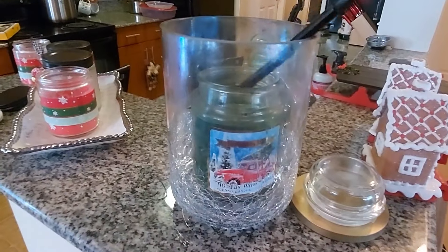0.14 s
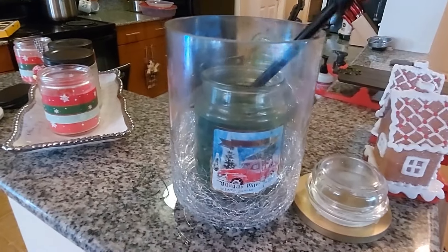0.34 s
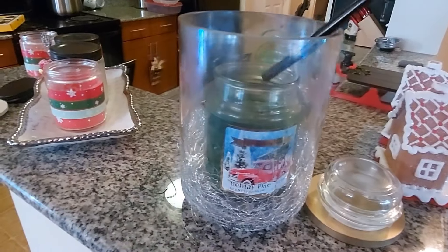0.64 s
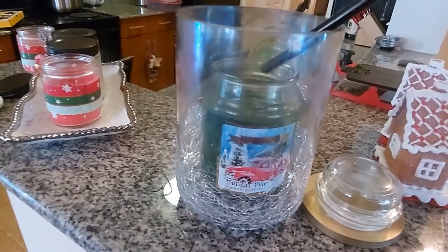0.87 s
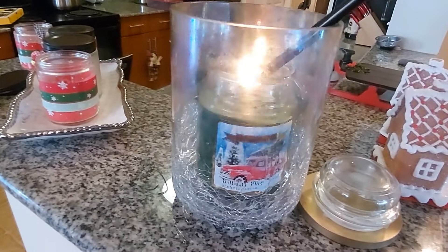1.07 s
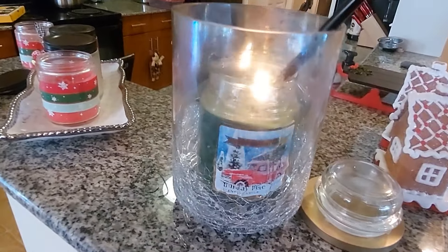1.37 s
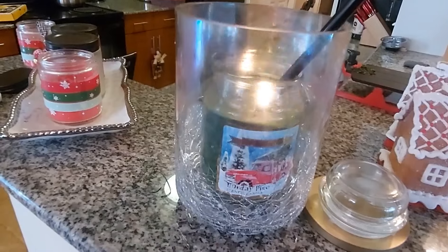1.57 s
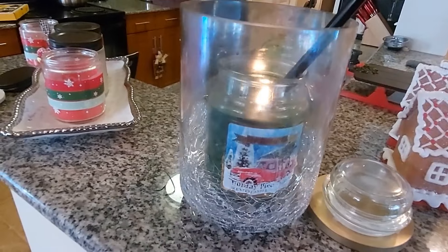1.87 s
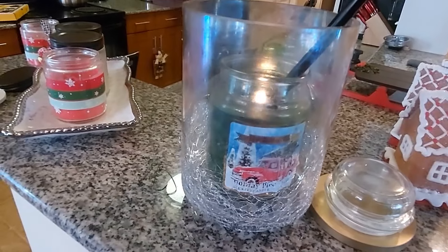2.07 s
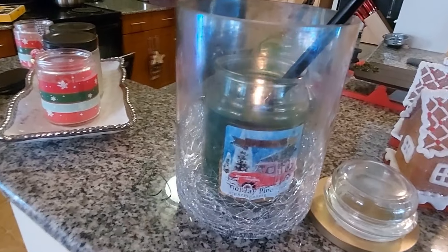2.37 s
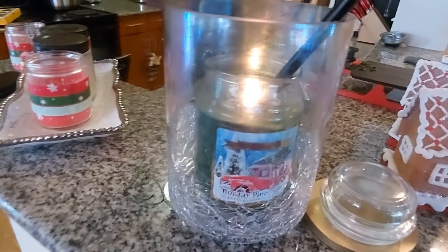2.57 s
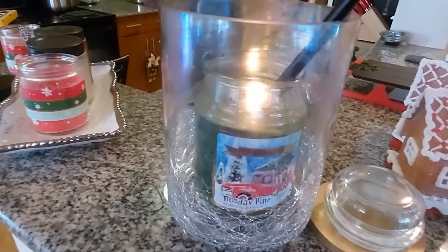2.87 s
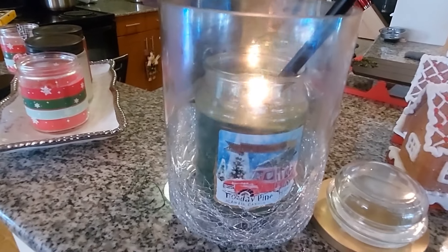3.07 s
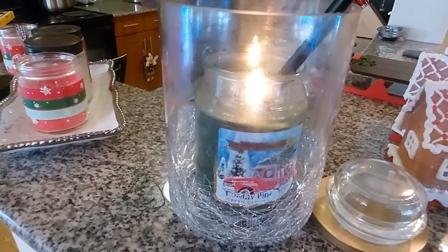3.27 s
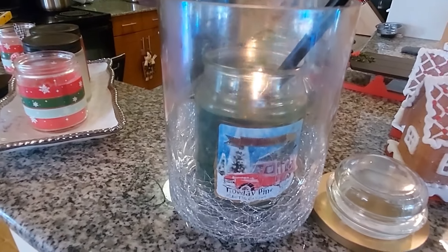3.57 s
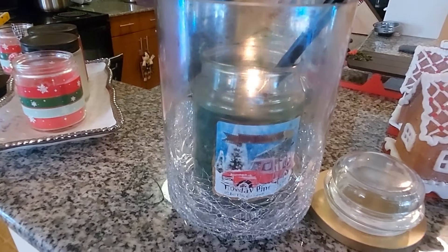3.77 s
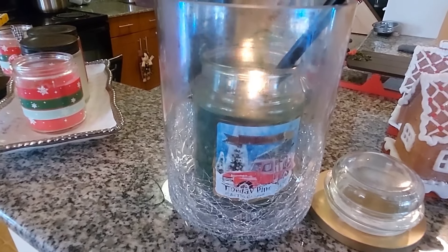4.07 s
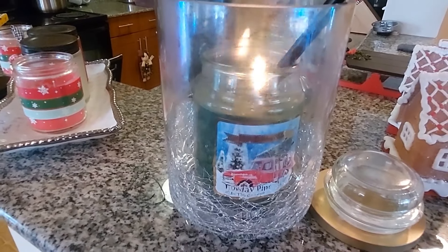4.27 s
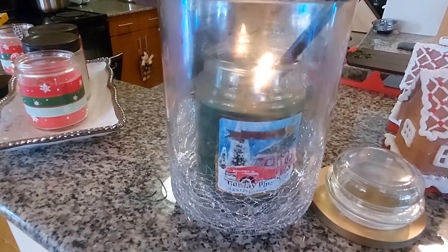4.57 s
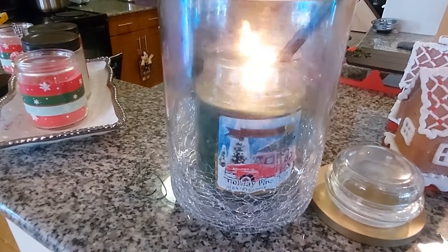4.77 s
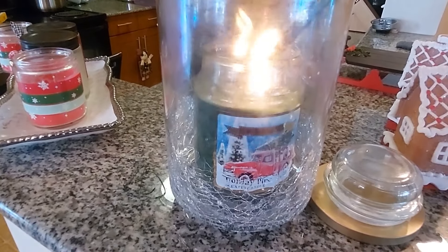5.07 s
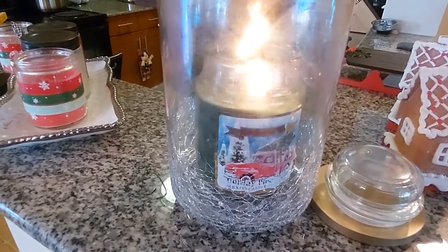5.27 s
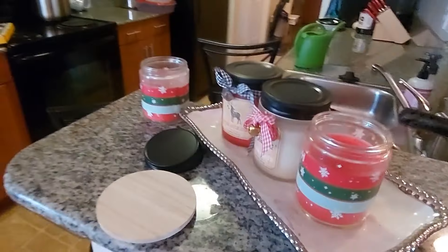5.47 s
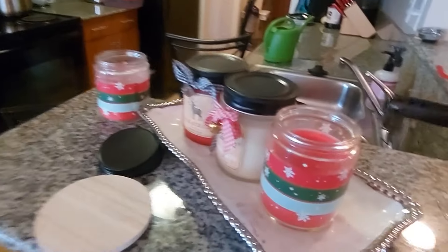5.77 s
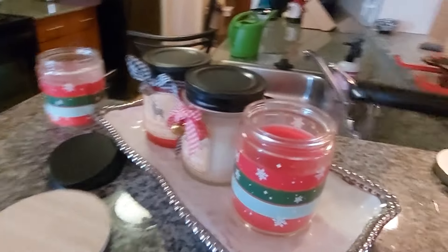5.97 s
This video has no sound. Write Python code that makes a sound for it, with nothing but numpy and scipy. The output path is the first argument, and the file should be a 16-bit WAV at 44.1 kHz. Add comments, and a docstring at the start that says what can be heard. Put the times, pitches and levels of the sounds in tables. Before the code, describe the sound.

A close stereo microphone in a small, quiet kitchen with low wavering hum and a soft, fluttering low rush. A gritty squeeze leads to a loud, sharp plastic lighter snap at 0.1 seconds, with a faint glass clink at 0.17. Around 0.5 to 0.6 the trigger scrapes and creaks back, then the nozzle clinks brightly on glass at 0.64 and 0.75, with a weaker clink at 0.83. A second hard snap at 0.98 is followed by a soft, low whump of catching gas at about 1.03, and another clink at 1.23. Delicate rim tinks come at 1.4, 2.0 and 2.7, between quiet stretches. Small plastic ticks and creaks scatter from 4.3 to 5.1. A brief cloth swish rises at 5.6, then the lighter lands on stone at 5.9 with a thud, hard taps, dull rubbing and a trigger rattle until about 6.1.

```python
"""A long utility lighter lights a jar candle that stands in a glass vase on a stone kitchen counter.
Its trigger snaps and creaks as short chatters of tiny impacts, coloured by the plastic case.
The nozzle clinks on the glass and the gas catches with a soft whump: both are sets of dying sine waves.
Then a sleeve swishes (moving band of noise) and the lighter lands with thuds, taps and rubbing.
An appliance hums (wavering sines) and a low rush swells (noise); the small kitchen reflects the blows."""
import sys
import numpy as np
from scipy import signal
from scipy.fft import rfft, irfft, next_fast_len
from scipy.io import wavfile
from scipy.ndimage import uniform_filter1d

SR = 44100
rng = np.random.default_rng(int(sys.argv[2]) if len(sys.argv) > 2 else 0)


def wrap_up_sound(samples):
    """Save the sound to the file named by the first command line argument, as 16-bit audio."""
    columns = np.atleast_2d(samples).T
    # keep every value between -1 and 1, then stretch to whole-number steps
    tamed = np.clip(columns, -1, 1)
    steps = np.round(tamed * 32767).astype(np.int16)
    wavfile.write(sys.argv[1], SR, steps)


N = 270333
TIME = np.arange(N) / SR
RING = TIME[:int(SR * .7)]  # time axis of one ring [s]

# colour of the lighter's plastic case: (frequency [Hz], level [dB])
CASE_COLOUR = [(60, -24), (220, -17), (600, -29.5), (1000, -14), (1300, -3), (1550, 5), (1950, -4.5),
               (2800, -8), (3800, -0.5), (4900, -2.5), (5900, -0.5), (8000, -9), (10500, 0), (13500, 4.5),
               (16000, -3)]
CASE_DB = -9  # level added to each snap and scrape of the case
CLICK_PAN_DB = 1.5  # left minus right
# the lighter and the hand land on the counter: (time [s], level [dB])
LANDINGS = [(5.8959, -0.5), (5.928, -14.5), (5.949, -9.5), (6.009, -23.5), (6.039, -19.5)]


def amp(db):
    """Turns decibels into a gain."""
    return 10 ** (np.asarray(db) / 20)


def unit(x):
    """Scales to an rms (average strength) of 1."""
    return x / np.sqrt(np.mean(x ** 2) + 1e-20)


def read(points, hz):
    """Reads a curve between its points, along a logarithmic frequency axis."""
    f, value = np.transpose(points)
    return np.interp(np.log(hz + 1), np.log(f + 1), value)


def sides(pan_db):
    """Left and right gains that differ by pan_db; positive is louder on the left."""
    return amp([[pan_db / 2], [-pan_db / 2]])


def add(mix, s, sound):
    """Adds a stereo sound to the mix at time s."""
    part = mix[:, max(round(s * SR), 0):][:, :sound.shape[1]]
    part += sound[:, :part.shape[1]]


def fade(t, t60):
    """Exponential decay that falls by 60 dB in t60 seconds."""
    return np.exp(-np.log(1000) * t / t60)


def drift(rate_hz):
    """Slow random wander of rms 1: noise with only its slowest parts kept."""
    hz = np.fft.rfftfreq(N, 1 / SR)
    slow = rfft(rng.standard_normal(N)) * np.exp(-(hz / rate_hz) ** 2)
    return unit(irfft(slow, N))


def pair(x):
    """Makes two unrelated channels alike in the bass, as two points close together hear them."""
    # how alike left and right are: (frequency [Hz], likeness [0 to 1])
    likeness = [(30, 0.99), (120, 0.53), (300, 0.8), (700, 0.43), (1500, 0.092), (15000, 0.033)]
    size = x.shape[1]
    a, b = rfft(x)
    same = np.clip(read(likeness, np.fft.rfftfreq(size, 1 / SR)), -1, 1)
    right = same * a + np.sqrt(1 - same ** 2) * b
    return irfft(np.array([a, right]), size)


def noise(colour):
    """Steady stereo noise of rms 1, shaped by a colour curve."""
    white = pair(rng.standard_normal((2, N)))
    gain = amp(read(colour, np.fft.rfftfreq(N, 1 / SR)))
    return unit(irfft(rfft(white) * gain, N))


def contact(colour, tilt_db, t60, rise=0.00037, pivot_hz=2500, size=4096):
    """A fast-dying chatter of tiny impacts, heard through a body of the given colour; energy about 1."""
    hz, t = abs(np.fft.fftfreq(size, 1 / SR)), TIME[:size]
    impacts = pair(rng.choice([-1., 1.], (2, size)))
    chatter = impacts * (1 - np.exp(-t / rise)) * fade(t, t60)
    # even out the chatter's own spectrum, so that the colour alone decides the balance
    power = uniform_filter1d(abs(np.fft.fft(chatter)) ** 2, size=24, axis=1, mode="wrap")
    octaves = np.log2(np.maximum(hz / pivot_hz, .5))  # no tilt further than one octave down
    gain = unit(amp(read(colour, hz) + tilt_db * octaves)) / np.sqrt(power)
    # minimum phase: the body rings only after the blow
    body = np.fft.ifft(np.exp(np.conj(signal.hilbert(np.log(gain))))).real
    return signal.fftconvolve(chatter, body[:, :size // 2], axes=1)


def ring(modes, tilt_db=0, rise=0.00063, scatter_db=1, pivot_hz=2500):
    """A struck body rings as dying sine waves; each blow weighs them a little differently."""
    # how far left leads right within a wave: (frequency [Hz], lead [radians])
    left_lead = [(450, 0), (1173, 0.8), (1680, 2.1), (2100, -0.3), (2938, -1.3), (3420, -0.15),
                 (3900, -2.5), (4400, -1.5), (5400, -0.8)]
    out = np.zeros((2, len(RING)))
    for hz, db, t60, pan_db in modes:
        level_db = db + scatter_db * rng.standard_normal() + tilt_db * np.log2(hz / pivot_hz)
        phase = read(left_lead, hz) * np.array([[.5], [-.5]])
        wave = np.sin(2 * np.pi * hz * RING + phase)
        out += amp(level_db) * sides(pan_db) * wave * fade(RING, t60)
    return out * (1 - np.exp(-RING / rise))


def stroke(peak_s, rise_db_per_s, fall_db_per_s):
    """Gain of a rubbing stroke that builds up to 1 at its peak and dies away."""
    before = (peak_s - TIME) * rise_db_per_s
    after = (TIME - peak_s) * fall_db_per_s
    return amp(-np.maximum(before, after))


def room_tone(level_db=-66.5):
    """Steady noise of the quiet room, strongest in the bass."""
    # colour of the room tone: (frequency [Hz], relative level [dB])
    tone_colour = [(15, -48), (25, -22.5), (55, -2), (84, -21), (99, -7.5), (120, 6.5), (148, -14),
                   (228, -3.5), (486, -19.5), (791, -29.5), (1180, -32), (1780, -35), (2520, -36.5),
                   (4330, -41), (15800, -43)]
    return amp(level_db) * noise(tone_colour)


def appliance_hum(waver_db=0.5, waver_turns=0.097):
    """Low sine tones whose level and phase each wander at random."""
    # tones of the appliance: (frequency [Hz], rms level [dB])
    tones = [(59.2, -79.5), (118.4, -77.5), (231.5, -75.5)]
    out = np.zeros(N)
    for hz, db in tones:
        level = amp(db + waver_db * drift(11))
        turns = hz * TIME + waver_turns * drift(1.6)
        out += level * np.sqrt(2) * np.sin(2 * np.pi * turns)
    return out


def rush(steady_db=-77, flutter_db=2.5):
    """Burning gas and moving air: low noise that flutters at random and swells now and then."""
    # colour of the rush: (frequency [Hz], level [dB])
    rush_colour = [(100, -21.5), (250, -3.5), (350, 0.5), (480, 0.5), (600, -16), (900, -24), (2500, -34.5),
                   (6000, -45)]
    # the rush swells and sinks again: (peak time [s], half length [s], level [dB])
    swell_list = [(0.85, 0.89, -67), (2.578, 0.23, -65.5), (3.52, 0.16, -71), (4.551, 0.093, -62.5),
                  (4.855, 0.31, -72), (5.598, 0.11, -64), (6.05, 0.15, -68)]
    power = amp(steady_db) ** 2
    for s, half_s, db in swell_list:
        power = power + (amp(db) * np.exp(-((TIME - s) / half_s) ** 2)) ** 2
    return noise(rush_colour) * np.sqrt(power) * amp(flutter_db * drift(6.7))


def background():
    """Room tone, hum and rush together, a little stronger on the right."""
    return (appliance_hum() + room_tone() + rush()) * sides(pan_db=-2.0)


def kitchen(x, first_s=0.0015):
    """Dense reflections from counter and cupboards, each band dying at its own speed."""
    # decay of the reflections: (frequency [Hz], time to fall by 60 dB [s])
    decay = [(100, 0.72), (500, 0.27), (1500, 0.41), (4000, 0.34), (10000, 0.35), (16000, 0.23)]
    # colour of the reflections: (frequency [Hz], level [dB])
    reflection_colour = [(100, -7.5), (400, 9.5), (1500, -7.5), (3000, -2.5), (6000, -3.5), (12000, -4),
                         (16000, -4.5)]
    shape = (2, len(RING))
    sparse = rng.standard_normal(shape) * (rng.random(shape) < .15)
    echoes = pair(sparse) * (RING > first_s)
    hz, t, z = signal.stft(echoes, SR, nperseg=256)
    tail = signal.istft(z * fade(t, read(decay, hz)[:, None]), SR, nperseg=256)[1]
    size = next_fast_len(N + SR)
    gain = amp(read(reflection_colour, np.fft.rfftfreq(size, 1 / SR)))
    response = rfft(tail / np.linalg.norm(tail[0]), size) * gain
    return irfft(rfft(x, size) * response, size)[:, :N]


def sleeve(width_octaves=0.93):
    """Cloth friction: a band of noise that climbs in pitch, quick to swell and slower to fade."""
    # colour of the cloth: (frequency [Hz], level [dB])
    cloth_colour = [(500, -2), (1000, -6), (1850, 1), (2200, 7.5), (2600, -1), (3800, -0.5), (5500, 0.5),
                    (8000, -5.5), (14000, 5)]
    peak_s, length_s, level_db = 5.585, 0.27, -68.5  # loudest moment, time until it stops, level
    peak_hz, octaves_per_s = 2130, 6.2  # band centre at the loudest moment, and its climb
    hz, t, z = signal.stft(noise(cloth_colour), SR, nperseg=512)
    centre = peak_hz * 2 ** (octaves_per_s * np.clip(t - peak_s, -length_s, length_s))
    distance = np.log2((hz[:, None] + 1) / centre)
    band = np.exp(-distance ** 2 / (2 * width_octaves ** 2))
    band /= np.sqrt(np.mean(band ** 2, axis=0))
    swing = stroke(peak_s, rise_db_per_s=172, fall_db_per_s=20) * (TIME < peak_s + length_s)
    return signal.istft(z * band, SR, nperseg=512)[1][:, :N] * amp(level_db) * swing


def slide(grain_db=3):
    """Dull, uneven rubbing on the stone that builds up to each landing and dies after it."""
    # colour of the rubbing: (frequency [Hz], level [dB])
    rub_colour = [(60, -5.5), (200, 10), (400, 2.5), (560, 9), (720, -15), (1200, -4.5), (3000, -28),
                  (12000, -31)]
    rub_db, rub_follows = -40.5, 0.82  # level at a 0 dB thud; dB of rub per dB of thud
    rubs = [amp(rub_db + rub_follows * db) * stroke(s, rise_db_per_s=527, fall_db_per_s=512)
            for s, db in LANDINGS]
    return noise(rub_colour) * np.max(rubs, axis=0) * amp(grain_db * drift(86))


def counter_thuds():
    """Each landing makes the stone counter ring low and briefly."""
    # ring of the counter: (frequency [Hz], level [dB], 60 dB decay [s], left minus right [dB])
    counter_modes = [(85, -30, 0.49, 0), (133, -31, 0.22, -1.5), (197, -19.5, 0.037, 5),
                     (216.6, -17, 0.043, -7), (286, -26, 0.095, 0), (338, -30.5, 0.07, 0),
                     (507, -35.5, 0.033, -6), (170, -22, 0.061, -5)]
    out = np.zeros((2, N))
    for s, db in LANDINGS:
        add(out, s, amp(db) * ring(counter_modes, rise=0.0031))
    return out


def counter_taps():
    """The lighter taps and rocks on the stone: short chatters of hard plastic."""
    # taps: (time [s], level [dB], brightness [dB per octave], 60 dB decay [s], left minus right [dB])
    tap_list = [(5.8673, -34.5, -2.5, 0.11, 8.5), (5.8952, -11, -1, 0.016, 8), (5.956, -23.5, -3, 0.095, 1),
                (6.0007, -25, 0.5, 0.0023, -8), (6.0063, -16.5, 2, 0.006, -6.5),
                (6.104, -40.5, -10, 0.013, -17)]
    # colour of hard plastic on stone: (frequency [Hz], level [dB])
    stone_colour = [(100, 3.5), (700, 1), (1600, -4.5), (2400, 2.5), (3200, -1), (3800, -4.5), (4800, 1.5),
                    (7000, -6), (10000, -4.5), (13000, 1), (16000, -8.5)]
    out = np.zeros((2, N))
    for s, db, tilt_db, t60, pan_db in tap_list:
        add(out, s, amp(db) * sides(pan_db) * contact(stone_colour, tilt_db, t60))
    return out


def ignition_whump():
    """The gas catches and sets the air in the vase ringing softly."""
    # the gas catches: (time [s], level [dB])
    puff_list = [(1.002, -18), (1.032, -4.5), (1.0405, -3), (1.079, -25.5)]
    # air in the vase: (frequency [Hz], level [dB], 60 dB decay [s], left minus right [dB])
    air_modes = [(120.37, -28.5, 0.14, -0.5), (139, -35.5, 0.017, -5.5), (406, -28, 0.11, -1),
                 (916, -47, 0.06, 1), (72.26, -38, 0.08, -2), (276, -33.5, 0.044, 0)]
    out = np.zeros((2, N))
    for s, db in puff_list:
        add(out, s, amp(db) * ring(air_modes, rise=0.001))
    return out


def rim_touches():
    """Light touches ring the rim of the inner jar."""
    # touches: (time [s], level [dB])
    touch_list = [(1.4075, 5.5), (1.604, -18.5), (1.9895, -9), (2.7, 0), (4.561, -17.5)]
    # ring of the rim: (frequency [Hz], level [dB], 60 dB decay [s], left minus right [dB])
    rim_modes = [(1171, -72.5, 0.19, 8), (2050, -72.5, 0.17, 12), (2390, -66, 0.075, 8),
                 (2577, -62, 0.1, 3.5), (2940, -62.5, 0.091, 5), (3370, -57, 0.014, 7),
                 (3590, -53, 0.014, 9), (8700, -65, 0.025, 4), (9770, -61.5, 0.011, -2),
                 (13500, -62, 0.0082, -5)]
    out = np.zeros((2, N))
    for s, db in touch_list:
        add(out, s, amp(db) * ring(rim_modes))
    return out


def glass_clinks(count=22):
    """The nozzle chatters on the glass, which rings, while the wax-filled jar answers dully."""
    # clinks: (time [s], level [dB], brightness [dB per octave], dull knock level [dB],
    #          60 dB decay of the chatter [s])
    clink_list = [(0.1691, -12.5, -2.5, -12.5, 0.0093), (0.6446, -4.5, 1, -2.5, 0.045),
                  (0.7492, -1, 0, 1, .035), (0.8260, -11, -6, -12, 0.022), (0.9842, -15, -3.5, -13, 0.06),
                  (1.082, -24, -4, -21.5, 0.052), (1.2315, -8.5, 2, -10, 0.023)]
    # ring of the glass: (frequency [Hz], level [dB], 60 dB decay [s], left minus right [dB])
    glass_modes = [(1173, -38, .22, 5), (1664, -30.5, .18, 2), (1673, -27.5, .31, 3), (1700, -29, .12, -1),
                   (2938, -40, .17, 1), (3333, -30.5, .1, 2), (3456, -25.5, .135, -8),
                   (3896, -25.5, .125, 7), (4000, -25, .13, 3), (4390, -32, .14, 5), (4420, -31, .135, 5),
                   (1490, -39, .06, 0), (2060, -48, .1, 2), (3500, -37, .06, 0), (4156, -45, .12, 0),
                   (5435, -45, .12, 3), (6322, -48, .11, -2), (7125, -49, .12, 2), (8786, -49, .09, 2),
                   (9475, -53, .12, 2), (10295, -50, .1, 2), (11610, -54, .09, 2)]
    # dull ring of the jar: (frequency [Hz], level [dB], 60 dB decay [s], left minus right [dB])
    wax_modes = [(322.2, -40.5, .07, 0), (437, -40.5, .06, -0.5), (642, -31, 0.066, 13),
                 (700, -38, .025, 12), (1093, -39, 0.076, 4.5)]
    # colour of the contact itself: (frequency [Hz], level [dB])
    knock_colour = [(60, -16), (200, -7), (450, -0.5), (680, 5), (900, -0.5), (1200, -5.5), (1600, 4),
                    (2400, -21.5), (3600, 5), (4400, 4.5), (5200, -19.5), (10000, -13), (16000, -19.5)]
    # high, faint overtones of the glass that ring on, before random detuning:
    # (lowest [Hz], highest [Hz], level at the lowest [dB], 60 dB decay [s])
    low_hz, high_hz, low_db, overtone_t60 = (5599.5, 14999.5, -58.5, 0.2162)
    overtones = []
    for hz in np.geomspace(low_hz, high_hz, count):
        detuned_hz = hz * 2 ** (rng.uniform(-1, 1) / 10)
        level_db = low_db - 6 * np.log2(hz / low_hz)
        overtones.append((detuned_hz, level_db, overtone_t60, 2))
    out = np.zeros((2, N))
    for s, db, tilt_db, knock_db, t60 in clink_list:
        add(out, s, amp(db) * ring(list(glass_modes) + overtones, tilt_db, rise=0.002, scatter_db=2.06))
        add(out, s, amp(knock_db) * ring(wax_modes))
        add(out, s, amp(knock_db) * sides(pan_db=3.0) * contact(knock_colour, tilt_db, t60))
    return out


def trigger_scrape(count=9):
    """Gritty squeeze of the trigger: tiny slips in its case at random moments."""
    # squeezes: (start [s], end [s], level of one slip before the case level [dB])
    squeeze_list = [(0.02, 0.082, -36), (0.496, .585, -36.5), (0.592, .64, -26.5)]
    out = np.zeros((2, N))
    for start, end, db in squeeze_list:
        for s in rng.uniform(start, end, count):
            add(out, s, amp(db + CASE_DB) * contact(CASE_COLOUR, tilt_db=-5.5, t60=.02))
    return out


def trigger_creaks():
    """The trigger creaks, springs back and rattles as the lighter is put down: a thin tick and a short ring."""
    # creaks and rattles: (time [s], level of the ring [dB])
    creak_list = [(0.591, 18.5), (4.332, -5.5), (4.4783, -6), (4.556, 0.5), (4.6681, -12), (4.7340, -8.5),
                  (4.8993, -8.5), (5.0341, 4.5), (5.0686, -1.5), (5.97, 12.5), (6.034, 6.5)]
    # ring of the trigger: (frequency [Hz], level [dB], 60 dB decay [s], left minus right [dB])
    trigger_modes = [(1040, -56.5, 0.018, 3.5), (1285.5, -56.5, .02, 1.5), (1576, -57.5, 0.052, 4)]
    tick_db = -51  # the same every time
    out = np.zeros((2, N))
    for s, db in creak_list:
        add(out, s, amp(db) * ring(trigger_modes, rise=.0006, scatter_db=2.5))
        tick = contact(CASE_COLOUR, tilt_db=3, t60=0.0095)
        add(out, s, amp(tick_db) * sides(CLICK_PAN_DB) * tick)
    return out


def trigger_snaps():
    """The igniter snaps and the plastic case rattles; harder snaps die away sooner."""
    # snaps and rattles: (time [s], level before the case level [dB], brightness [dB per octave])
    snap_list = [(0.0684, -34.5, -4), (0.091, 14.5, -1.5), (0.3367, -21, -2.5), (0.55, -29.5, -6.5),
                 (0.5885, -9, -6), (0.5919, -0.5, -5), (0.8283, -5.5, -4), (0.9823, 15, -2.5),
                 (5.0665, -20, 0)]
    t60_at_0_db, db_per_halving = 0.0125, 43.5  # decay [s] of a 0 dB snap; dB that halve it
    out = np.zeros((2, N))
    for s, db, tilt_db in snap_list:
        t60 = t60_at_0_db * 2 ** (-db / db_per_halving)
        add(out, s, amp(db + CASE_DB) * sides(CLICK_PAN_DB) * contact(CASE_COLOUR, tilt_db, t60))
    return out


def scene():
    """All sources, close by, with the kitchen's reflections of the blows."""
    lighter = trigger_snaps() + trigger_creaks() + trigger_scrape() + counter_taps()
    glass = glass_clinks() + rim_touches()
    lows = ignition_whump() + counter_thuds()
    reflections = kitchen(amp(-4.5) * lighter + amp(-8.5) * glass + amp(-15.0) * lows)
    return lighter + glass + lows + reflections + sleeve() + slide() + background()


def record(dry, low_hz=38, high_hz=16200):
    """Rolls off the deepest bass, then cuts the highest treble."""
    high_pass = signal.butter(2, low_hz, "high", fs=SR, output="sos")
    thin = signal.sosfilt(high_pass, dry)
    low_pass = signal.firwin(255, high_hz, window=("kaiser", 9), fs=SR)
    return signal.oaconvolve(thin, low_pass[None], "same")


dry = scene()
out = record(dry)
wrap_up_sound(out)
```